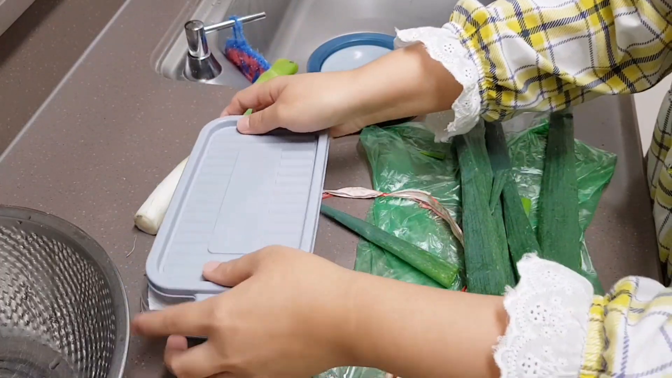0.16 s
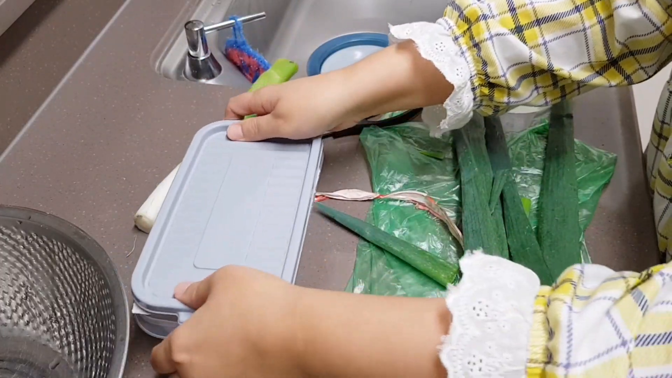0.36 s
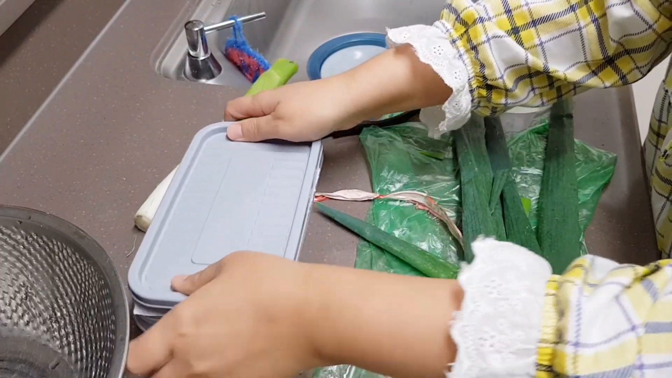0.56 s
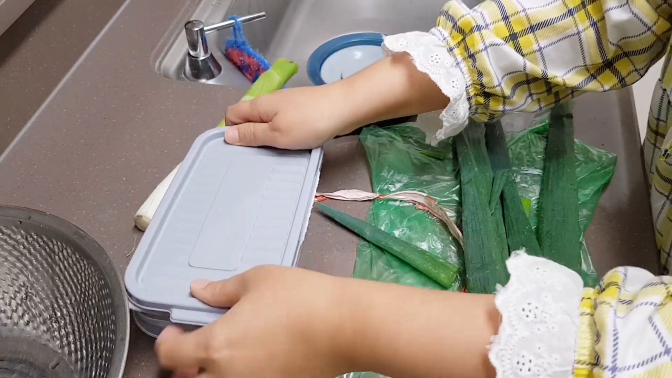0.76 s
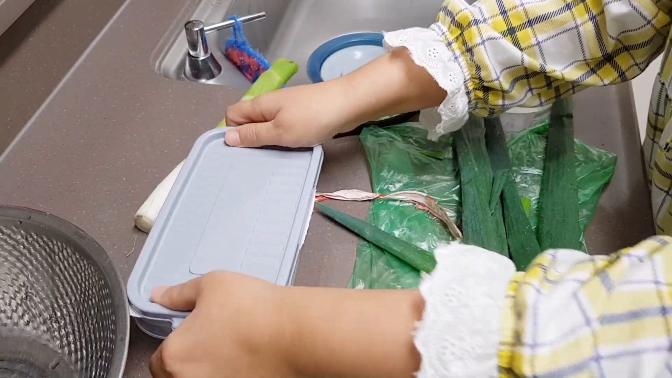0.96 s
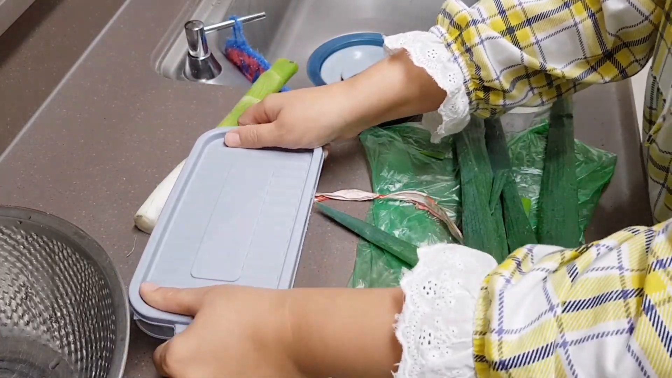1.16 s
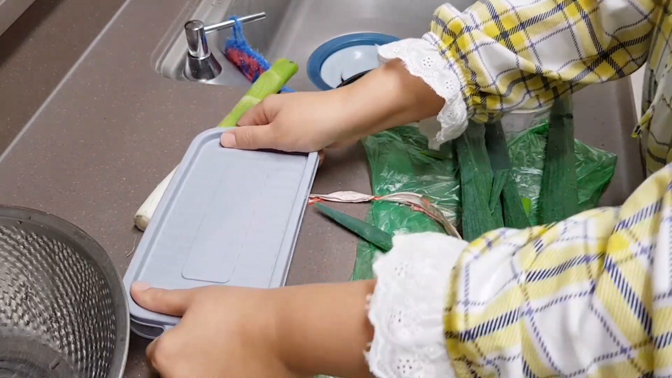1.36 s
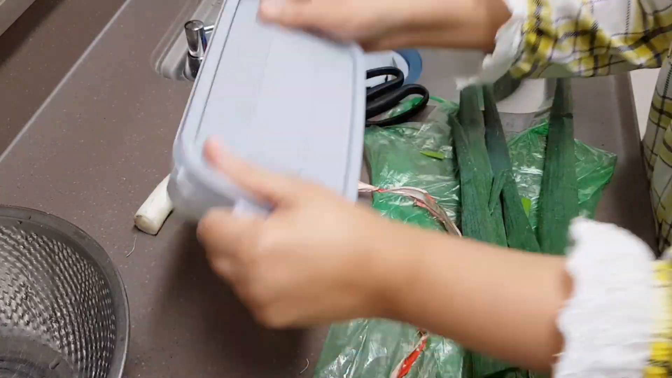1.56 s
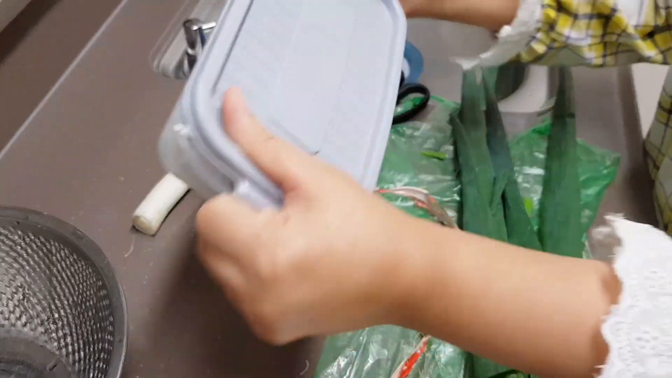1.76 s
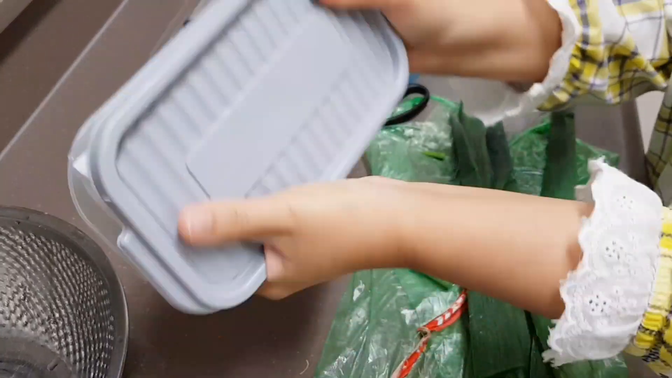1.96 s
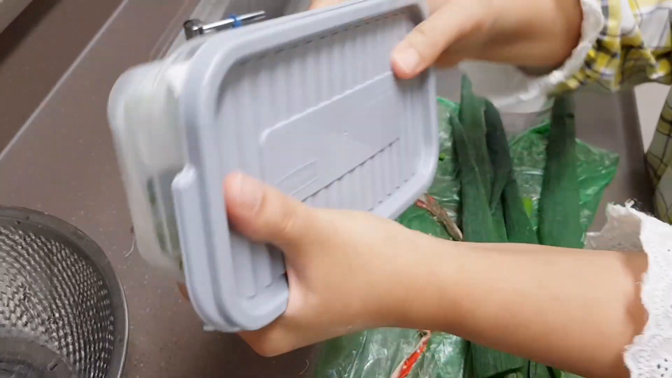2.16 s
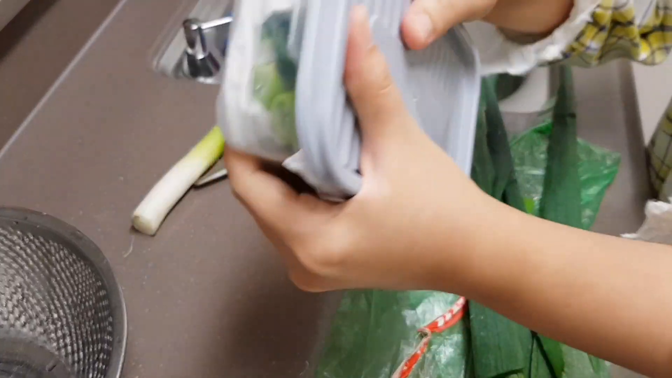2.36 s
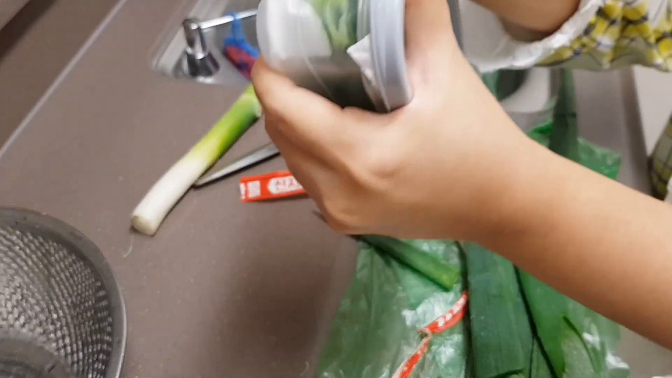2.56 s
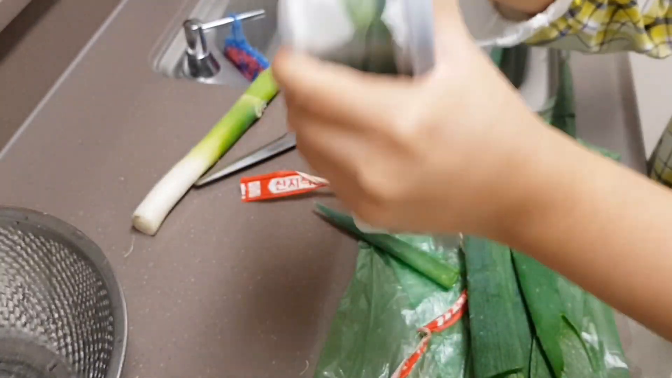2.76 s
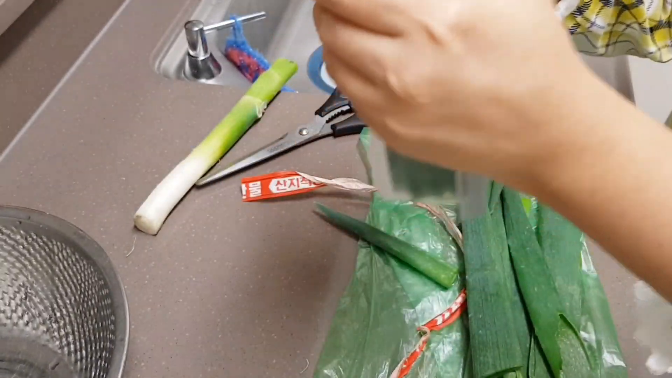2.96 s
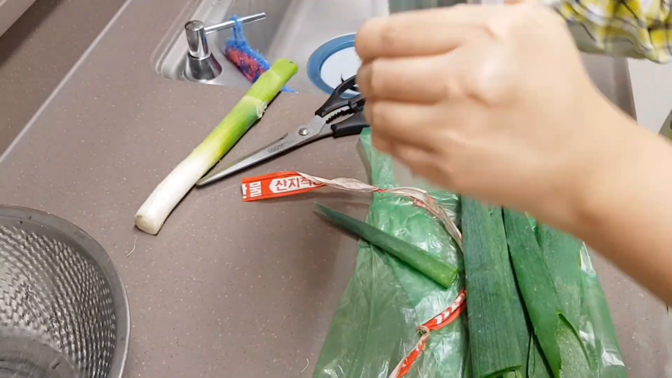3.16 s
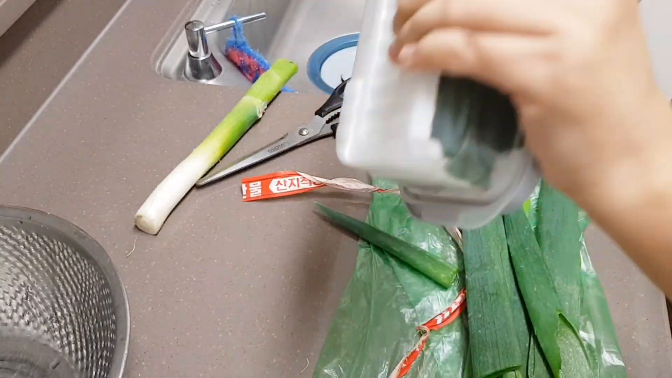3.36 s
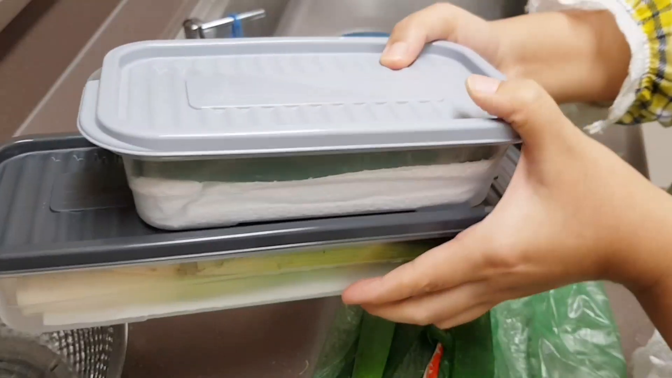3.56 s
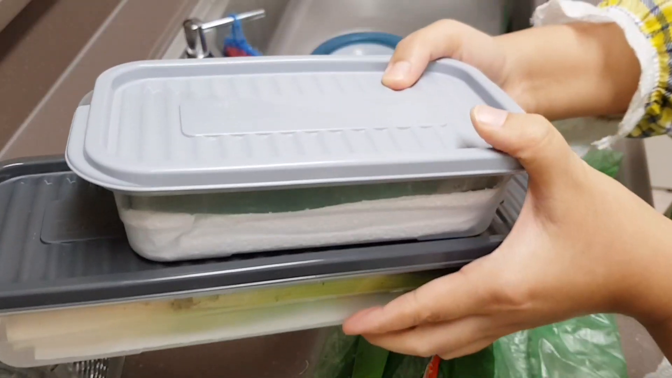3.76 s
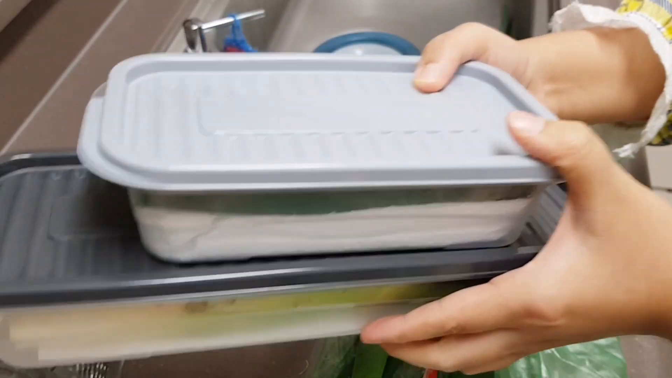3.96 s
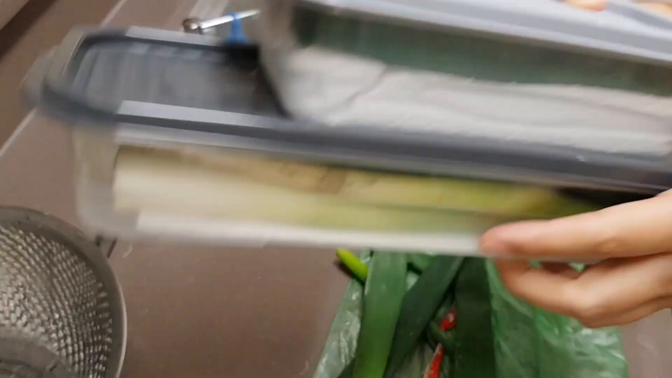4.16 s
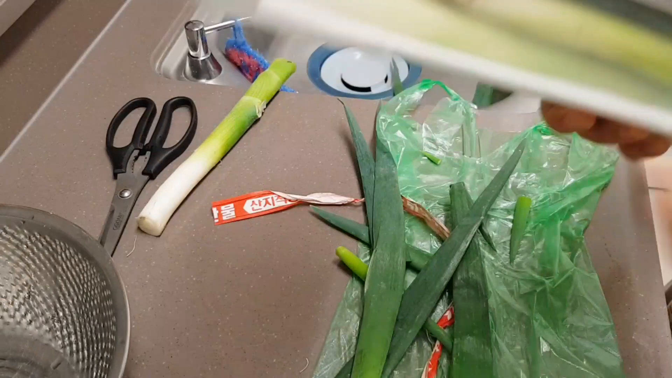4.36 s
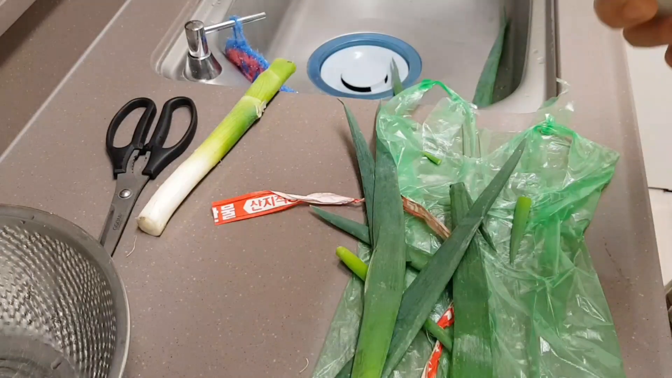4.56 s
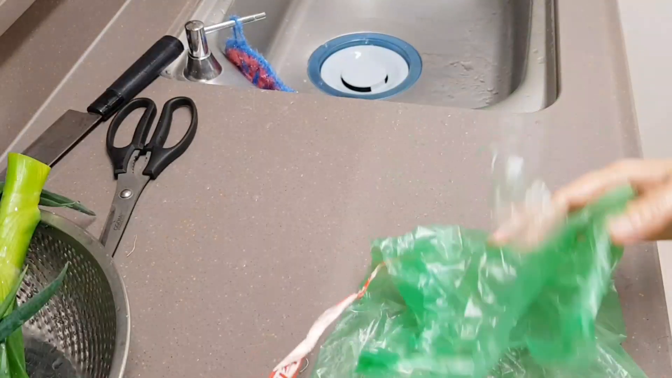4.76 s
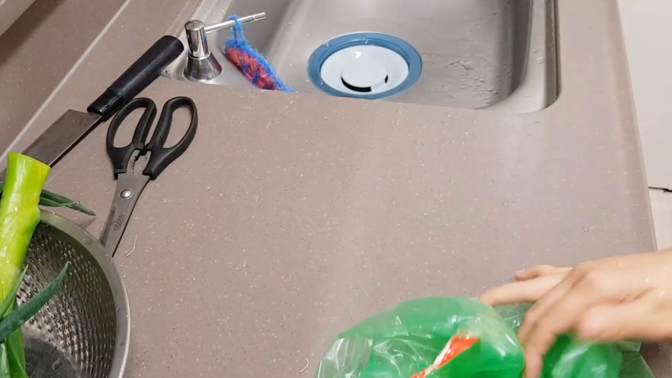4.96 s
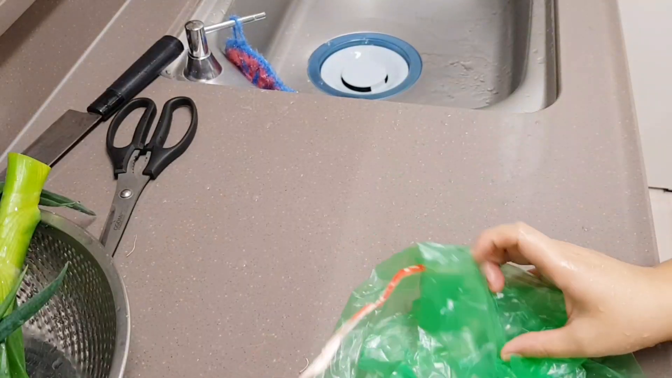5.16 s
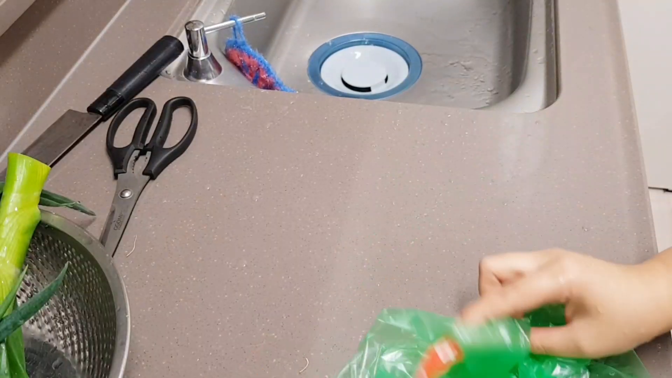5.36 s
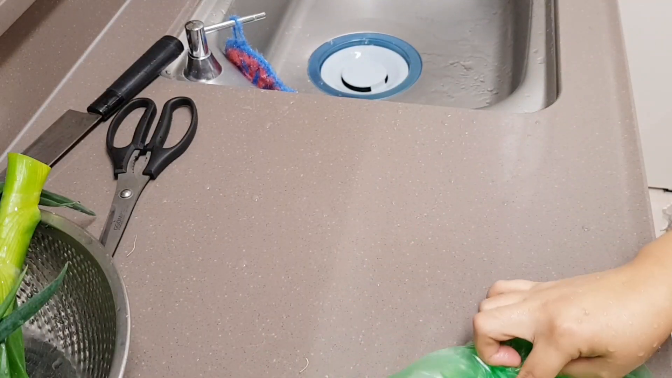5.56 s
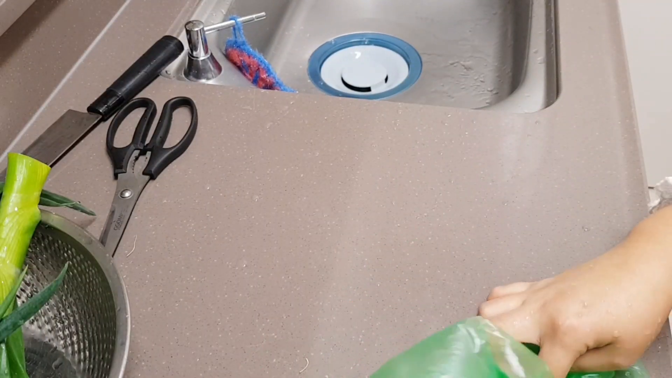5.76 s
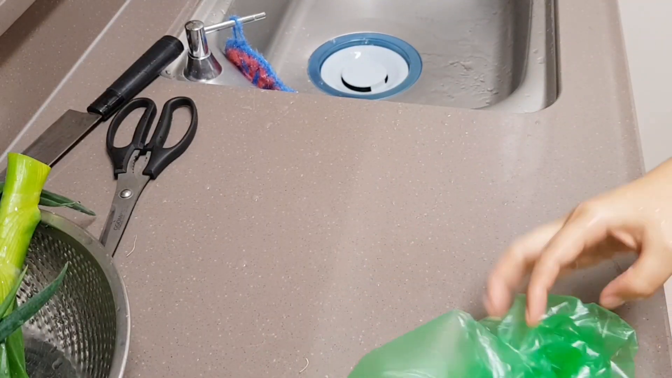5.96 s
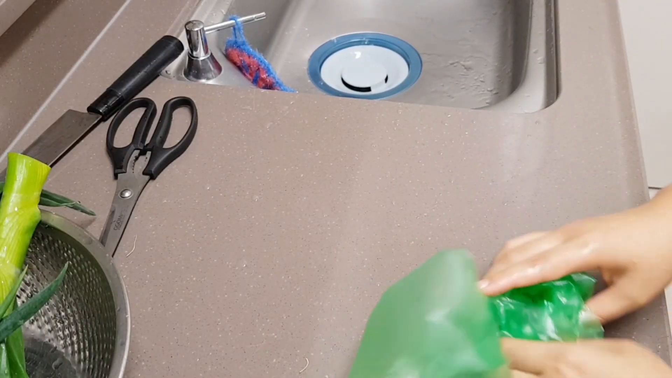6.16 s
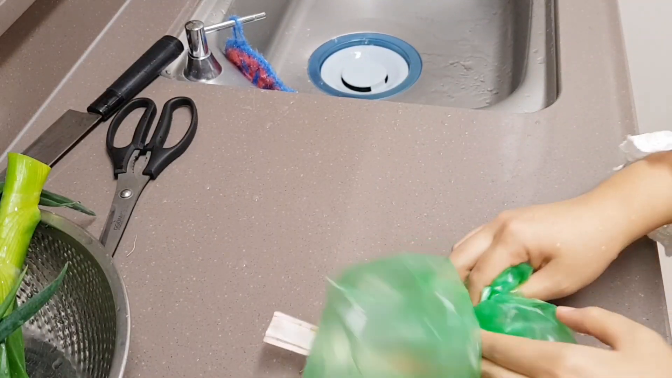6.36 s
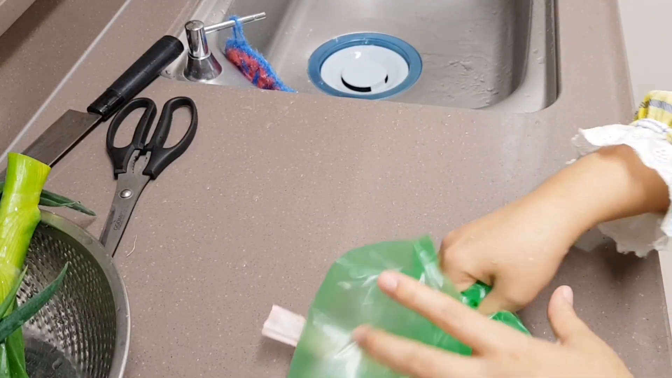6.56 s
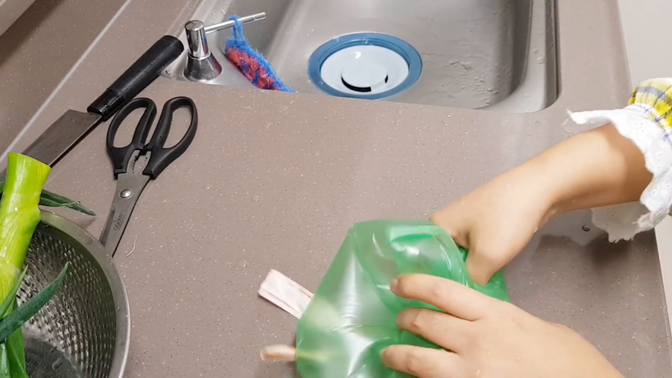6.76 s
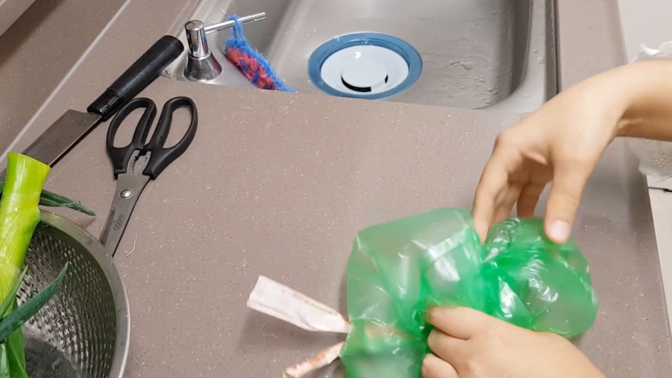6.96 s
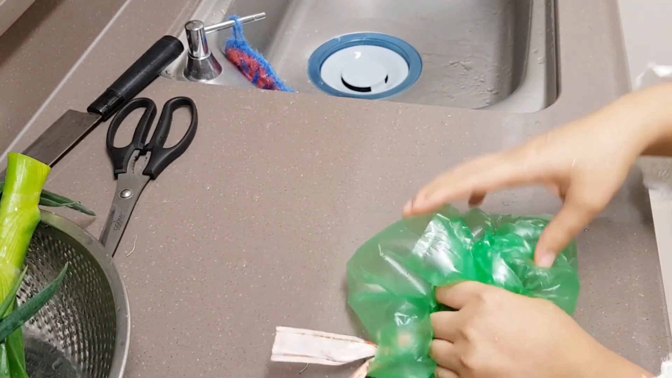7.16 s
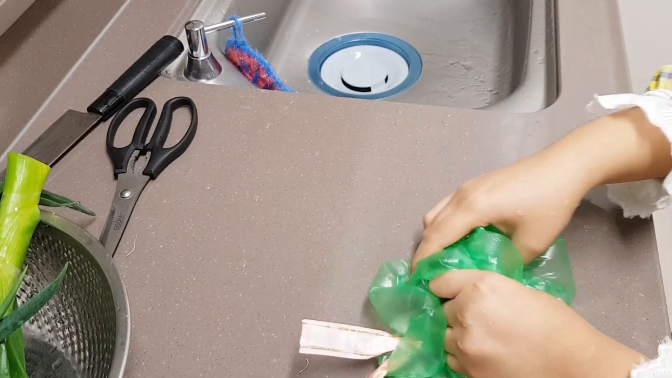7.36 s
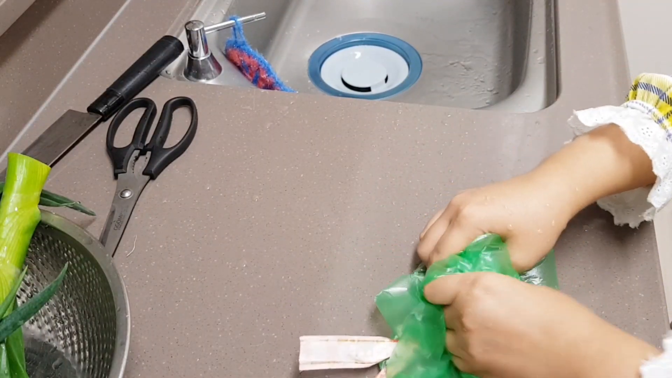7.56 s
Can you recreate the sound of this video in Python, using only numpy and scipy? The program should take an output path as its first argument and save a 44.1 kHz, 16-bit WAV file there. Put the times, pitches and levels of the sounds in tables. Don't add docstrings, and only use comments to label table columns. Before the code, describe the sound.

Close stereo sound at a home kitchen counter: faint rubbing, a hard plastic lid snap with metallic ringing, then boomy slaps and dry palm strokes on a hollow container. Two containers shift almost silently with small squeaks. After an abrupt cut, thin plastic film rustles steadily, swelling into sharp crinkles and low puffs. Short hard-walled echo, soft bass rumble.

```python
import sys
import numpy as np
from scipy import signal
from scipy.fft import rfft, irfft, next_fast_len
from scipy.io import wavfile
from scipy.ndimage import uniform_filter1d, map_coordinates

SR = 44100
rng = np.random.default_rng(int(sys.argv[2]) if len(sys.argv) > 2 else 0)


def wav_record(signal):
    frames = np.transpose(np.atleast_2d(signal))
    bounded = np.clip(frames, -1, 1)
    quanta = np.round(bounded * 32767).astype(np.int16)
    wavfile.write(sys.argv[1], SR, quanta)


def volts_from_decibels(level):
    exponent = np.asarray(level, float) / 20
    return 10 ** exponent


N = 335589


def unit(x):
    return x / np.sqrt(np.mean(x ** 2) + 1e-20)


def along(points, hz):
    point_hz, value = np.transpose(points)
    return np.interp(np.log(hz + 1), np.log(point_hz + 1), value)


def curves(rows):
    seconds, *columns = np.transpose(rows)
    return [np.interp(np.arange(N) / SR, seconds, column) for column in columns]


def wobble(rate):
    return map_coordinates(rng.standard_normal(N // 100), [np.arange(N) * rate / SR])


def filtered(x, response):
    m = next_fast_len(N + SR // 2)
    return irfft(rfft(x, m) * response(np.fft.rfftfreq(m, 1 / SR)), m)[..., :N]


def peak(f, hz, width):
    return 1j * f * width / (hz * hz - f * f + 1j * f * width)


def strokes(rows, bend):
    s, db, rise, fall, low_db = np.transpose(rows)[..., None]
    coarse = np.arange(0, N, 32)
    late = coarse / SR - s
    distance = np.maximum(-late / abs(rise), late / abs(fall))
    power = volts_from_decibels(2 * (db - 10 * distance ** bend))
    layers = power, power * volts_from_decibels(2 * low_db)
    return [np.interp(np.arange(N), coarse, np.sqrt(layer.sum(0))) for layer in layers]


def rush(spectrum, alike, patchy_db=2, per_s=3000, grain=0, spread_db=4, life_s=.001):
    z = signal.stft(rng.standard_normal((2, N)), nperseg=256)[2]
    patches = uniform_filter1d(rng.standard_normal(z.shape[1:]), size=5, axis=0)
    patches = uniform_filter1d(patches, size=9, axis=1)
    noise = signal.istft(z * volts_from_decibels(patchy_db * unit(patches)), nperseg=256)[1][:, :N]
    sizes = volts_from_decibels(spread_db * np.clip(rng.standard_normal(N), -3, 2.2))
    starts = (rng.random(N) < per_s / SR) * sizes
    fading = signal.lfilter([1], [1, -np.exp(-1 / (life_s * SR))], starts)
    bursts = fading * rng.standard_normal((2, N))
    share = np.clip(grain, 0, 1)
    pair = np.sqrt(1 - share) * unit(noise) + np.sqrt(share) * unit(bursts)

    def middle_and_side(hz):
        turn = np.arccos(np.clip(along(alike, hz), -1, 1)) / 2
        return volts_from_decibels(along(spectrum, hz)) * np.array([np.cos(turn), np.sin(turn)])

    mid, side = filtered(pair, middle_and_side)
    return np.array([mid + side, mid - side]) / np.std(mid)


# start in seconds, peak level in dB, thump pitch in Hz, thump level in dB, crack level in dB.
LID_BLOWS = [(0.243, -60.5, 200, 5, -10), (0.379, -54, 567, -2, -29), (0.452, -47, 704, -8, -15),
             (0.7289, -24, 365.4, -17.5, -36.5), (0.7313, -17.5, 365.4, -15.5, -36.5),
             (0.7376, -24.5, 376, -12, -36), (1.045, -52.5, 730, -4, -32), (1.118, -35, 400, -9.5, -25),
             (1.395, -55, 154, -2, -12.5), (1.433, -45, 387, -8, -8), (1.756, -33.5, 189, -3, -11.5),
             (1.933, -42, 206, 4, -22), (1.944, -46.5, 202, 3, -22), (1.998, -30, 142, 2.5, -6),
             (1.9935, -36, 196, -4, -14), (2.137, -52, 180.6, 7.5, -10), (2.3624, -28.5, 326, 0.5, -16),
             (2.927, -43.5, 520, -15, -12), (3.429, -62, 194, 2, -11), (4.103, -64, 468, 0, -24.5)]
SIDE_BLOWS = [
    (0.843, -41.5, 177.5, 2, -24),
    (0.974, -58, 501, 4, -16),
    (1.7867, -30.5, 301.4, -10, -14.5),
    (2.0115, -46, 170, 6, -15),
    (2.3735, -27, 356, -3, -14),
    (2.564, -34, 153.3, -3, -27),
    (2.545, -33.5, 229.7, 4, -24),
    (4.298, -59.5, 380, -0.5, -22),
]
END_BLOWS = [
    (0.756, -25.5, 364, -22, -30),
    (2.548, -20.5, 451, -11, -12.5),
    (2.7815, -37, 201, -8, -12),
    (2.7836, -33, 144, -4, -9),
    (2.796, -40.5, 155.7, -7.5, -13.5),
    (3.127, -43.5, 390, -12.5, -25),
]
# pitch in Hz, width in Hz, level in dB.
STANDING_BOX = [(261, 91, -13), (364, 36, -1), (560, 91, -9), (886, 77, -3), (1290, 114, -5),
                (1643, 170, -2.5), (2300, 640, -6.5), (2900, 400, -4.5), (3960, 790, -5.5)]
LIFTED_BOX = [(231, 70, -3.5), (373.6, 40, -1.5), (480, 76, -5), (760, 200, -10), (1130, 200, -7.5),
              (1450, 130, -3), (1770, 160, -1), (2297, 340, -5), (2840, 300, -10.5), (4200, 1000, -7.5)]


def knocks():
    out, walls, cracks = np.zeros((3, N + SR))
    t = np.arange(SR // 4) / SR
    panels = [(893, LID_BLOWS), (1425, SIDE_BLOWS), (1834, END_BLOWS)]
    for wall_hz, rows in panels:
        for s, db, thump_hz, thump_db, crack_db in rows:
            at = slice(round(s * SR), round(s * SR) + len(t))
            waver, rattle, grit = rng.standard_normal((3, len(t)))
            thump = np.sin(2 * np.pi * thump_hz * t) * volts_from_decibels(-60 * t / 0.044) * (1 - np.exp(-t / 0.0018))
            panel = np.sin(2 * np.pi * wall_hz * t + 0.04 * np.cumsum(waver))
            panel *= volts_from_decibels(-60 * t / 0.031) * (1 - np.exp(-t / 0.00039))
            out[at] += volts_from_decibels(db + thump_db + 9.0) * thump + volts_from_decibels(db - 3) * panel
            push = 4.84 * np.exp(-t / .0001)
            rattle *= volts_from_decibels(-60 * t / 0.041) + 0.31 * volts_from_decibels(-60 * t / 0.2)
            walls[at] += volts_from_decibels(db + 3) * (push + rattle)
            grit *= 0.76 * volts_from_decibels(-60 * t / 0.012) + 0.19 * volts_from_decibels(-60 * t / 0.079)
            cracks[at] += volts_from_decibels(db + crack_db + 14.0) * (-2 * (t == 0) + grit)

    def box(modes):
        def response(f):
            total = sum((-1) ** k * volts_from_decibels(db) * peak(f, hz, width) for k, (hz, width, db) in enumerate(modes))
            return total / (1 + 1j * f / 5000) ** 2
        return response

    lifted = np.arange(N) / SR > 1.6
    standing_sound = filtered(walls[:N] * ~lifted, box(STANDING_BOX))
    lifted_sound = filtered(walls[:N] * lifted, box(LIFTED_BOX))
    crack_sound = filtered(cracks[:N], lambda f: peak(f, 5700, 7000) ** 2)
    return out[:N] + standing_sound + lifted_sound + crack_sound


# start in seconds, level in dB, pitch in Hz, time to fall 60 dB in seconds.
WALL_RINGS = [(.7295, -25, 890, 0.063), (.7295, -34, 1240, .05), (0.7298, -32.5, 1640, .05),
              (.75, -36, 3950, .06), (.844, -40, 620, .04), (1.756, -42, 1150, .03),
              (1.7865, -33, 872, 0.066), (1.7864, -31, 1170, .03), (1.7865, -37, 2130, .035),
              (1.7865, -43, 2840, .03), (1.7863, -36, 439, 0.059), (1.933, -40, 540, .06),
              (1.933, -39, 738, 0.059), (1.935, -43, 870, .05), (1.996, -37.5, 1010, .04),
              (2.012, -41, 1300, .03), (2.3625, -36, 700, .05), (2.3735, -36.5, 705, 0.057),
              (2.5478, -32, 1140, 0.043), (2.5475, -32.5, 696, 0.031), (2.56, -36, 600, .08),
              (2.782, -38.5, 800, 0.046), (2.782, -37.5, 1125, 0.065), (2.782, -44, 2180, 0.051),
              (2.927, -42, 650, 0.027), (1.393, -53, 850, .04), (2.5475, -34, 2300, .03),
              (2.5475, -38, 3000, .02)]


def wall_rings():
    out, t = np.zeros(N + SR), np.arange(SR // 4) / SR
    for s, db, hz, t60 in WALL_RINGS:
        fade = volts_from_decibels(db - 60 * t / t60) * (1 - np.exp(-t / .0004))
        out[round(s * SR):][:len(t)] += fade * np.sin(2 * np.pi * hz * t)
    return out[:N]


# start in seconds, level in
# dB, pitch in Hz, swell time in seconds, time to fall 60 dB in seconds.
AIR_BOOMS = [
    (2.392, -22, 373, .022, .085),
    (1.762, -37.5, 230, 0.0084, 0.166),
    (.7295, -26.5, 370, 0.0027, 0.0497),
    (6.5, -29.5, 380, 0.0092, 0.099),
]


def air_booms():
    out, t = np.zeros(N + SR), np.arange(SR // 4) / SR
    for s, db, hz, swell, t60 in AIR_BOOMS:
        waver = 0.011 * np.cumsum(rng.standard_normal(len(t)))
        fade = volts_from_decibels(db - 60 * t / t60) * (1 - np.exp(-t / swell))
        out[round(s * SR):][:len(t)] += fade * np.sin(2 * np.pi * hz * t + waver)
    return out[:N]


def after_blows():
    kicks = np.zeros((2, N))
    for s, db, _, thump_db, _ in LID_BLOWS + SIDE_BLOWS + END_BLOWS:
        kicks[:, round(s * SR)] = volts_from_decibels(2 * db), volts_from_decibels(2 * (db + thump_db))
    t60 = 0.22
    return np.sqrt(signal.lfilter([1], [1, -volts_from_decibels(-120 / (t60 * SR))], kicks))


# time in seconds, hiss level in dB, seconds to rise the last 10 dB, seconds to fall 10 dB,
# scrape level over the hiss in dB.
PRESSING_STROKES = [(0, -67.5, .05, 0.03, 4), (.09, -66, .04, .07, -9), (.04, -71.5, .1, .1, 4),
                    (.125, -72, .03, 0.07, 11.5), (.21, -72, .3, .05, -4), (.58, -77, .15, .15, 9),
                    (.3, -75, 0.3, .3, 9), (.39, -73, .025, .06, 15), (.458, -60, 0.04, 0.04, 6),
                    (.505, -63, .04, -0.02, 5), (.696, -66, 0.06, .04, -1.5), (.78, -55, 0.05, .07, 6),
                    (.853, -57, .012, 0.03, 11.5), (.906, -64, 0.1, 0.05, 9.5), (.977, -72, .012, .02, 8),
                    (1.048, -71, .008, .12, 7), (1.01, -79, .1, .1, 12), (1.185, -58, 0.06, .06, 5),
                    (1.245, -64, .02, .06, 3), (1.318, -63, .006, .04, 0), (1.412, -58.5, .025, .05, 0)]
TURNING_STROKES = [(1.452, -54.5, 0.049, 0.063, 1.5), (1.585, -54.5, 0.061, 0.06, -5.5),
                   (1.68, -68, 0.026, 0.035, -1), (1.75, -67, 0.031, .05, 1.5),
                   (1.841, -57.5, 0.11, 0.056, 5), (1.936, -58.5, 0.016, .03, 8.5),
                   (2.056, -46.5, 0.039, 0.041, -16), (2.145, -59, 0.036, 0.016, -3),
                   (2.31, -56, 0.13, 0.11, -6), (2.4, -51.5, 0.031, 0.041, -1),
                   (2.511, -49.5, 0.057, 0.032, -4), (2.656, -52, 0.11, 0.051, -11),
                   (2.77, -61, 0.037, .03, -9.5), (2.81, -57, 0.026, 0.039, -1),
                   (2.912, -55, 0.026, 0.06, -10), (3.07, -69, 0.086, .06, -3),
                   (3.18, -54.5, 0.054, 0.041, -7), (3.33, -66, 0.068, 0.055, -2.5),
                   (3.46, -66, 0.035, 0.075, -1.5)]
STACKING_STROKES = [
    (3.537, -69, 0.011, 0.024, -1.5),
    (4.195, -67.5, 0.041, 0.05, 3),
    (4.31, -78.5, .02, 0.063, 6),
    (4.39, -73.5, 0.048, 0.062, -6),
    (4.655, -70, 0.029, 0.048, 5),
]
# time in seconds, level in dB, pitch in Hz, half length in seconds.
LID_SQUEAKS = [
    (3.765, -78, 1130, 0.014),
    (4.342, -74, 1650, 0.05),
    (4.658, -62.5, 1105, 0.039),
    (0.456, -59.5, 1925, 0.012),
    (0.498, -71, 1925, 0.015),
    (1.056, -69.5, 2500, .01),
    (4.204, -68, 2550, 0.02),
    (4.652, -68.5, 3880, .035),
]
# pitch in Hz, level per Hz in dB.
PALM_COLOR = [(1180, -36.5), (2000, -4.5), (3710, -6), (4270, -4), (5870, -1), (8820, -5), (14100, -3.5),
              (16100, -14.5), (16500, -27.5)]
SCRAPE_COLOR = [(400, -12), (750, 5), (1200, -0.5), (1900, -0.5), (3000, -12), (5000, -25.5)]
HOLLOW_COLOR = [(100, -20), (150, -5.5), (230, -7.5), (370, -2.5), (520, -5), (700, -15), (1100, -49)]
# pitch in Hz, likeness from -1 to 1.
BOX_LIKENESS = [(60, 0.94), (150, 0.97), (380, 0.6), (950, 0.66), (2380, -0.58), (5980, 0.045),
                (15000, -0.47)]


def hands():
    t = np.arange(N) / SR
    hiss, rub = strokes(PRESSING_STROKES + TURNING_STROKES + STACKING_STROKES, bend=1.33)
    blow, thump = after_blows()
    rest = volts_from_decibels(np.where(t < SCENE_CHANGES[0][0], -67.5, -71.5))
    boom = np.sqrt(rest ** 2 + (volts_from_decibels(-2.5) * rub) ** 2 + (volts_from_decibels(-11.5) * thump) ** 2)
    rub = np.hypot(rub, volts_from_decibels(-25.5) * blow)
    grip = wobble(35)
    hushed = (t > .728) & (t < .8445)
    palm = hiss * volts_from_decibels(-24 * hushed + grip)
    palm = palm * rush(PALM_COLOR, BOX_LIKENESS, patchy_db=2.2, per_s=900, grain=0.1, life_s=0.0014, spread_db=3)
    scrape = rub * volts_from_decibels(-3.0 + grip)
    scrape = scrape * rush(SCRAPE_COLOR, BOX_LIKENESS, patchy_db=3.0, per_s=290, grain=0.12, life_s=.003)
    hollow = boom * volts_from_decibels(0.71 * wobble(23)) * rush(HOLLOW_COLOR, BOX_LIKENESS, patchy_db=2.0)
    for s, db, hz, half in LID_SQUEAKS:
        tone = unit(signal.lfilter(*signal.iirpeak(hz, 9, SR), rng.standard_normal(N)))
        scrape += volts_from_decibels(db) * np.exp(-((t - s) / half) ** 2) * tone
    return (palm + scrape + hollow) * (t < SCENE_CHANGES[1][0])


# time in seconds, peak level in dB, half length in seconds, pitch in Hz.
FINGER_SCUFFS = [
    (0.8455, -35, .001, 9000),
    (1.6, -36.5, .001, 6970),
    (1.923, -51.5, 0.0036, 6000),
    (1.9915, -35.5, 0.0013, 9000),
    (1.9953, -25.5, 0.0027, 7600),
    (2.7845, -29, 0.0026, 7480),
    (1.315, -54, 0.00092, 3000),
    (1.674, -53, 0.0023, 2500),
    (.198, -56, .003, 6500),
    (.408, -58, .002, 7000),
]
# time in seconds, peak level in dB, half length in seconds, pitch in Hz.
NAIL_CLICKS = [(1.118, -26, .0005, 1000), (1.787, -24, .0007, 1400), (2.3627, -20, .0001, 6000),
               (2.3737, -18, .0001, 6500), (2.548, -16, .0007, 1600), (2.5476, -24, .00012, 5500),
               (2.7758, -36, .00008, 8000), (2.9275, -33, .0001, 5500), (3.1272, -41, .0007, 1500),
               (4.1055, -63, .0003, 2000), (1.395, -48, .0004, 1500)]


def finger_tips():
    out, t = np.zeros(N + SR), np.arange(-SR // 50, SR // 50) / SR
    for s, db, half, hz in FINGER_SCUFFS:
        scuff = unit(signal.lfilter(*signal.iirpeak(hz, .8, SR), rng.standard_normal(len(t))))
        out[round(s * SR) - SR // 50:][:len(t)] += volts_from_decibels(db) * np.exp(-(t / half) ** 2) * .5 * scuff
    for s, db, half, hz in NAIL_CLICKS:
        click = np.exp(-(t / half) ** 2) * np.sin(2 * np.pi * hz * t)
        out[round(s * SR) - SR // 50:][:len(t)] += volts_from_decibels(db) * click
    return out[:N]


# pitch in Hz, level in dB, time to fall 60 dB in seconds.
STEEL_TONES = [(1504, -16, 0.85), (1516, -30, .5), (1860, -14, 0.22), (2100, -16, .2), (2270, -8, 0.37),
               (2540, -13.5, 0.21), (3075, -12, 0.2), (3460, -19.5, 0.26), (3910, -1.5, .1),
               (4100, -9, .13), (4205, -12, 0.091), (4953, -16.5, .1), (6300, -21, .1), (6800, -18, .06)]


def steel_tool():
    out, t = np.zeros(N + SR), np.arange(SR // 2) / SR
    ring = np.zeros(len(t))
    for hz, db, t60 in STEEL_TONES:
        waver = .0018 / t60 * np.cumsum(rng.standard_normal(len(t)))
        ring += volts_from_decibels(db - 60 * t / t60) * np.sin(2 * np.pi * hz * t + waver)
    band = signal.butter(4, [3800, 7200], "band", fs=SR)
    rattle = signal.lfilter(*band, rng.standard_normal(len(t)))
    ring += 2.0 * volts_from_decibels(-60 * t / 0.11) * rattle
    out[round(.731 * SR):][:len(t)] += volts_from_decibels(-25.5) * ring * (1 - np.exp(-t / 0.0028))
    return out[:N]


# time in seconds, crackle level in dB, fold size as low-layer level in dB.
BAG_GRIP = [
    (4.83, -40.5, -8.5),
    (5.25, -41, -7),
    (5.36, -42.5, -3),
    (5.8, -41, -7.5),
    (6.4, -40.5, -3),
    (6.64, -42.5, -8.5),
    (6.9, -40, -2.5),
    (7.2, -41, -2),
    (7.61, -43, -4),
]
# time in seconds, crackle level in dB, seconds to rise the last 10 dB,
# seconds to fall 10 dB, fold size in dB.
BAG_SQUEEZES = [(4.85, -42.5, 0.8, -0.1, -5.5), (5.035, -37.5, 0.06, 0.08, -8.5),
                (5.078, -37.5, 0.07, 0.1, -10.5), (5.15, -36, .05, 0.05, -8),
                (5.2, -38.5, 0.03, 0.15, -6.5), (5.318, -38, 0.08, 0, -5), (5.42, -39, 0, 0.04, -5),
                (5.462, -38, 0.08, 0.02, -7.5), (5.5, -37.5, 0.06, 0.08, -8), (5.655, -35, .12, 0.08, -8),
                (5.72, -41, .04, 0, -9), (5.805, -35, 0.11, .05, -8), (5.885, -31.5, 0.07, 0.05, -5.5),
                (6.0, -36.5, .08, 0.01, -0.5), (6.038, -38, 0.03, 0.02, 6.5),
                (6.035, -33, 0.05, 0.07, -5.5), (6.095, -34.5, 0.06, 0.09, -5),
                (6.25, -34.5, 0.05, 0.07, -5), (6.3, -29, 0.06, 0.0746, -4), (6.378, -30, .05, 0.01, -3.5),
                (6.43, -35.5, 0.07, 0.06, -1.5), (6.525, -30, 0.09, 0.05, -8.5),
                (6.655, -43, 0.4, -0.2, -8.5), (6.72, -31, .02, 0.1, -3.5), (6.765, -33, .05, .06, -3),
                (6.85, -37, 0.08, 0.07, 1.5), (6.92, -34, .05, .04, -2.5), (6.96, -33, .04, .05, -0.5),
                (7.018, -30, .035, .05, 0.5), (7.07, -29.5, .04, 0.07, 0), (7.145, -37, 0.02, 0.1, -4),
                (7.29, -38, 0.07, 0.2, -2.5), (7.39, -35.5, 0.09, 0, -3.5), (7.452, -31, 0.035, 0.1, -2.5),
                (7.545, -36.5, 0.06, 0.3, -2.5)]
# pitch in Hz, level per Hz in dB.
CRACKLE_COLOR = [(1180, -18.5), (2000, -5), (4880, -2), (7260, -1.5), (8820, -6), (11600, -1.5),
                 (15750, -4.5), (16200, -28.5), (16500, -33.5)]
FOLD_COLOR = [(300, -25), (700, -2.5), (1200, 1), (2000, -2), (3000, -3.5), (6000, -27.5)]
PUFF_COLOR = [(70, -25), (150, -7), (350, -1.5), (520, 4.5), (700, -5), (1200, -29)]
# pitch in Hz, likeness from -1 to 1.
BAG_LIKENESS = [(60, 0.31), (150, 0.95), (380, 0.84), (950, 0.55), (2380, 0.46), (5980, 0.11), (15000, 0.0)]


def bag():
    steady_db, size_db = curves(BAG_GRIP)
    bright, low = strokes(BAG_SQUEEZES, bend=1.18)
    bright = np.hypot(volts_from_decibels(steady_db), bright)
    low = np.hypot(volts_from_decibels(steady_db + size_db), low)
    squeeze = wobble(45)
    crackle = bright * volts_from_decibels(0.5 * squeeze + 0.4 * wobble(160))
    crackle = crackle * rush(CRACKLE_COLOR, BAG_LIKENESS, patchy_db=1.5, per_s=2700, grain=0.17,
                             life_s=0.0002, spread_db=2)
    fold = low * volts_from_decibels(-1.5 + 0.3 * squeeze + 0.54 * wobble(30))
    fold = fold * rush(FOLD_COLOR, BAG_LIKENESS, patchy_db=1.5, per_s=500, grain=0.18, life_s=0.00089)
    air_push = low * (low / bright) ** 0.37
    puff = air_push * volts_from_decibels(-9.5 + 0.3 * wobble(25)) * rush(PUFF_COLOR, BAG_LIKENESS, patchy_db=2.0)
    return (crackle + fold + puff) * (np.arange(N) / SR > SCENE_CHANGES[1][0])


# start in seconds, peak level in dB, puff level in dB, puff pitch in Hz.
BIG_CREASES = [(5.032, -17, -35, 530), (5.147, -20.5, -38, 501), (5.864, -15.5, -43, 439),
               (5.893, -16, -31, 143), (6.037, -23, -34.5, 482), (6.279, -19.5, -20, 444),
               (6.33, -23.5, -32.5, 519), (6.384, -16.5, -17, 390), (6.526, -24, -20, 519),
               (6.649, -21.5, -32, 366), (6.708, -18.5, -33, 506), (6.824, -21, -10, 392),
               (6.854, -21, -9.5, 452), (6.996, -14, -12.5, 380), (7.047, -14.5, -15, 340),
               (7.052, -10, -12.5, 213), (7.058, -21, -17, 220), (7.065, -14, -16, 360),
               (7.447, -19, -18, 471), (7.4563, -8.5, -30, 450), (5.455, -21, -32, 450),
               (6.045, -18, -22, 500), (7.022, -14, -22, 400), (6.878, -13, -30, 450),
               (7.392, -15, -30, 450), (6.534, -15, -30, 450), (5.222, -20, -30, 450),
               (6.986, -24, -4, 470), (7.005, -24, -5, 340), (7.069, -17, -8, 1000)]


def creases():
    out, t = np.zeros(N + SR), np.arange(SR // 10) / SR
    for s, db, puff_db, puff_hz in BIG_CREASES:
        fade = volts_from_decibels(-60 * t / 0.0029) + 0.37 * volts_from_decibels(-60 * t / 0.039)
        burst = volts_from_decibels(db - 8.5) * fade * rng.standard_normal(len(t))
        push = volts_from_decibels(db + puff_db + 2.5 - 60 * t / 0.03) * np.sin(2 * np.pi * puff_hz * t)
        out[round(s * SR):][:len(t)] += burst + push
    return filtered(out[:N], lambda f: peak(f, 1320, 13000) ** 2)


# pitch in Hz, time to fall 60 dB in seconds.
TILE_ECHO = [(150, 0.097), (1500, 0.16), (6000, 0.13), (14000, 0.13)]


def room(x):
    hz, t, z = signal.stft(rng.standard_normal((2, SR // 2)), SR, nperseg=256)
    fade = volts_from_decibels(-60 * t / along(TILE_ECHO, hz)[:, None])
    tail = signal.istft(z * fade, SR, nperseg=256)[1]
    late = np.pad(x, (150, 0))[None]
    return signal.fftconvolve(late, tail / np.linalg.norm(tail[0]), axes=1)[:, :N]


# time in seconds, level in dB.
COUNTER_SHAKE = [(0.0, -62), (0.45, -59.5), (0.61, -51.5), (0.68, -60.5), (0.89, -56.5), (1.23, -71),
                 (1.68, -70), (1.78, -57.5), (2.03, -57.5), (2.58, -58.5), (3.26, -69), (4.6, -72.5),
                 (4.76, -65), (5.3, -75.5), (5.93, -59), (6.98, -68.5), (7.08, -52), (7.2, -71.5)]
# pitch in Hz, level per Hz in dB.
SHAKE_COLOR = [(15, -29), (30, -15.5), (55, -0.5), (85, 0), (105, -5.5), (140, -29), (300, -65.5)]
AIR_COLOR = [(300, -30.5), (600, -10), (1200, -14), (2000, -21), (3700, -20), (8000, -31), (14000, -20),
             (16300, -29.5)]


def kitchen():
    level_db = curves(COUNTER_SHAKE)[0] + 1.1 * wobble(20)
    shake = volts_from_decibels(level_db) * rush(SHAKE_COLOR, [(50, 0.94)], patchy_db=-2.0)
    air = volts_from_decibels(-82.0) * rush(AIR_COLOR, [(600, .7), (2000, .2)], patchy_db=.5)
    return shake + air


def heard(x, side, lag_s):
    sign = np.array([[1], [-1]])
    return filtered(x, lambda hz: volts_from_decibels(sign * along(side, hz) / 2) * np.exp(-1j * np.pi * hz * lag_s * sign))


# pitch in Hz, left over right in dB.
BOX_LEFT = [(60, 7.5), (180, 5.0), (550, 3.5), (1650, 4.0), (4970, 3.5), (15000, 5.0)]
BAG_LEFT = [(60, 6.5), (180, 3.0), (550, 3.0), (1650, 3.0), (4970, 2.0), (15000, 3.5)]


def scene():
    blows = knocks() + steel_tool() + wall_rings()
    clicks = finger_tips() + air_booms()
    snaps = creases()
    box = hands() + blows + volts_from_decibels(-7.5) * room(blows + clicks) + kitchen()
    film = bag() + snaps + volts_from_decibels(-4.5) * room(snaps)
    box_heard = heard(box, BOX_LEFT, lag_s=-0.000074)
    tips_heard = heard(clicks * np.ones((2, 1)), BOX_LEFT, lag_s=-.00003)
    return box_heard + tips_heard + heard(film, BAG_LEFT, lag_s=.00007)


def low_pass(x):
    return signal.sosfilt(signal.butter(12, 16890, fs=SR, output="sos"), x)


# start in seconds, end in seconds.
SCENE_CHANGES = [
    (3.516, 3.535),
    (4.809, 4.835),
]


def record(dry):
    t = np.arange(N) / SR
    gates = [np.clip(np.maximum(a - t, t - b) / 0.0012, 0, 1) for a, b in SCENE_CHANGES]
    gate = np.prod(gates, axis=0) + volts_from_decibels(-53) * (t < 4.823)
    dulled = filtered(dry, lambda hz: np.where(hz < 16250, 1, volts_from_decibels(-40.0)))
    return low_pass(dulled * gate)


dry = scene()
out = record(dry)
wav_record(out)
```